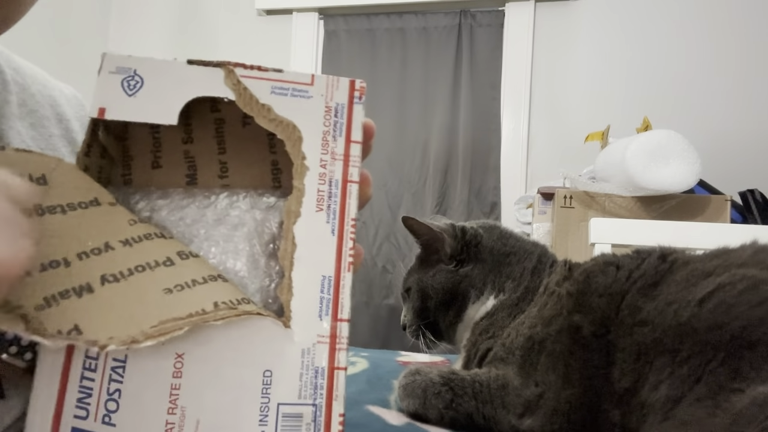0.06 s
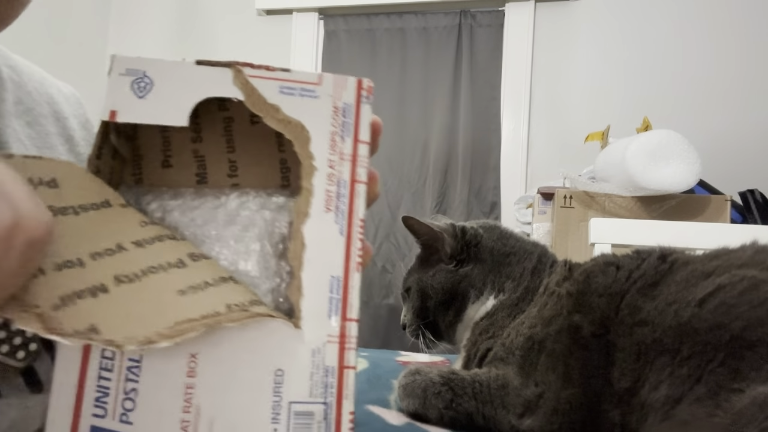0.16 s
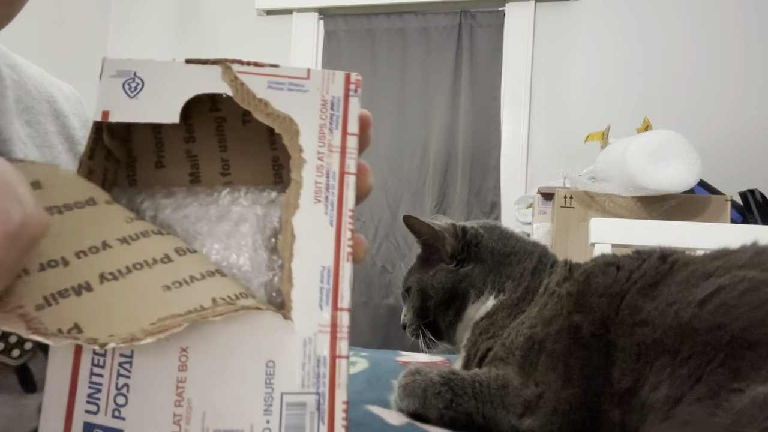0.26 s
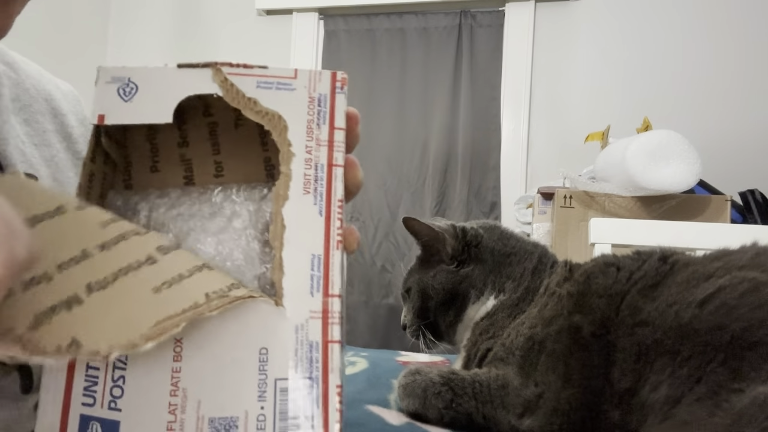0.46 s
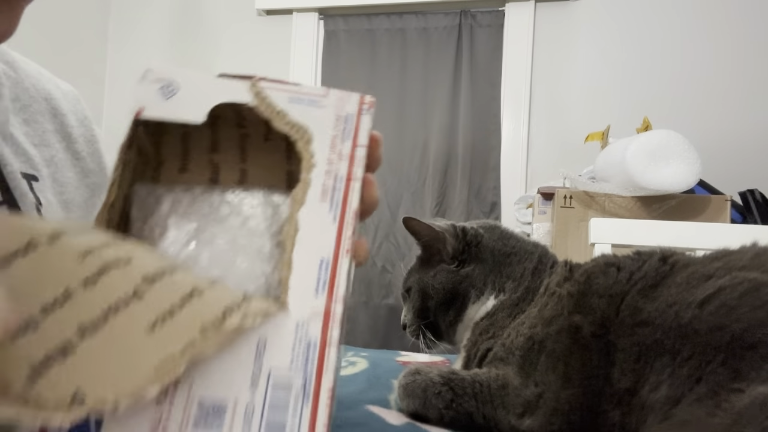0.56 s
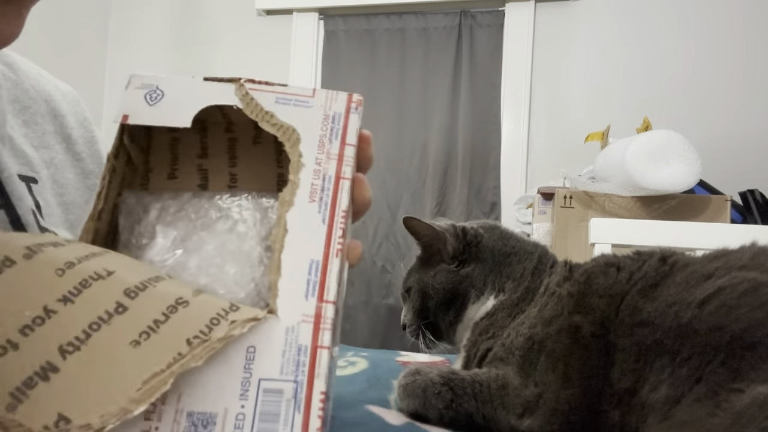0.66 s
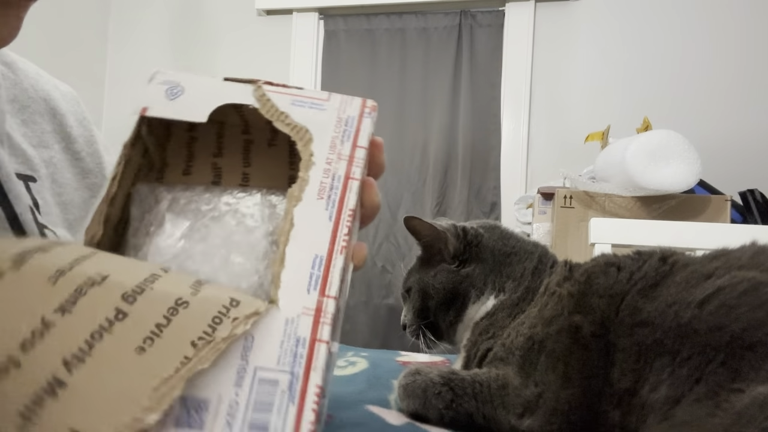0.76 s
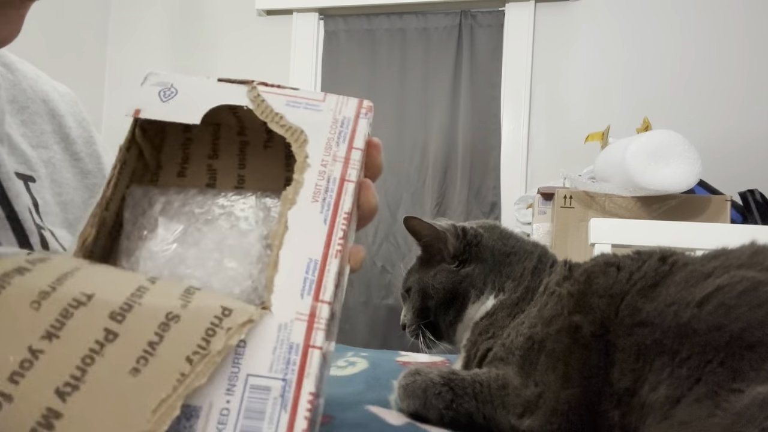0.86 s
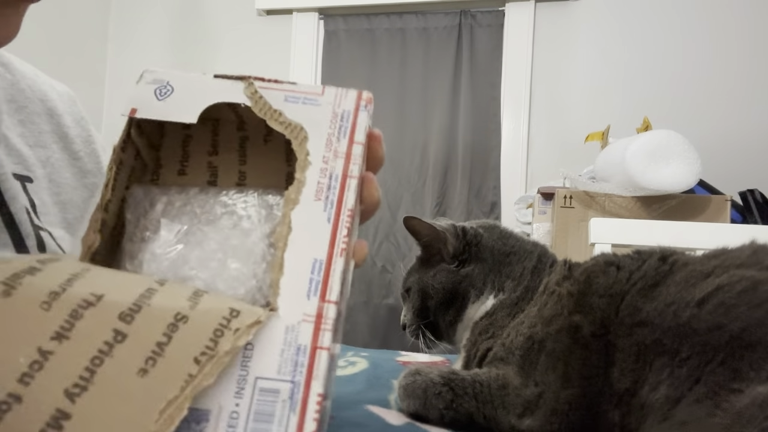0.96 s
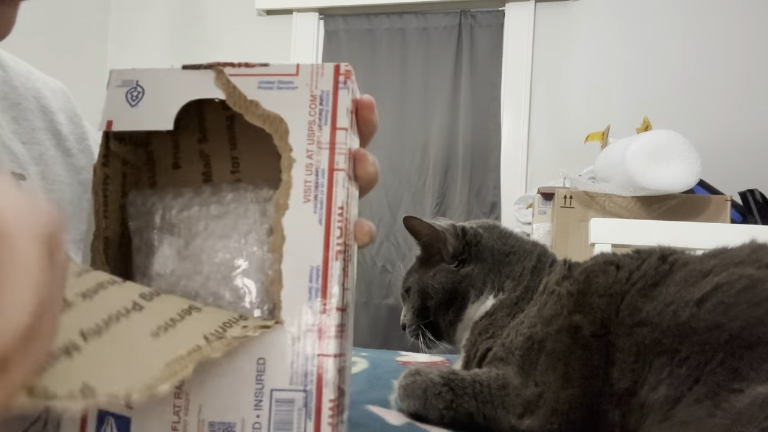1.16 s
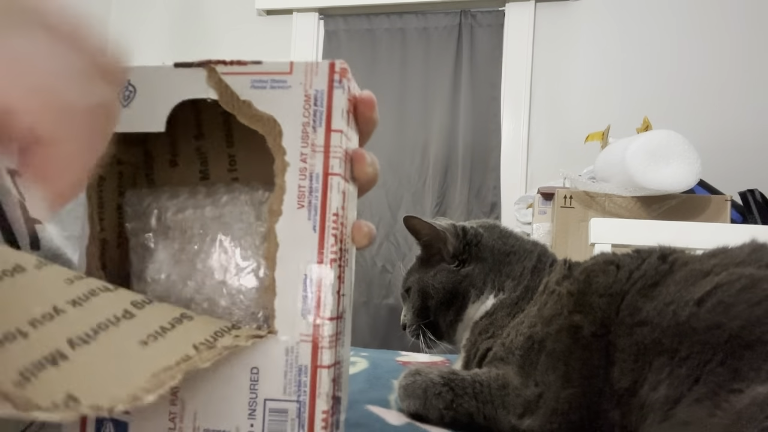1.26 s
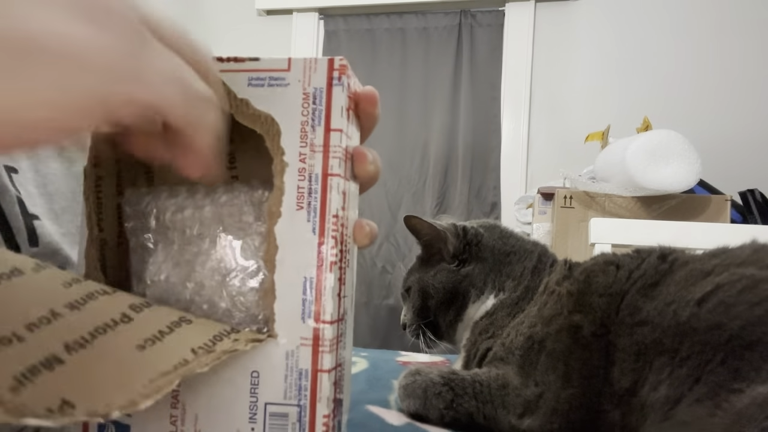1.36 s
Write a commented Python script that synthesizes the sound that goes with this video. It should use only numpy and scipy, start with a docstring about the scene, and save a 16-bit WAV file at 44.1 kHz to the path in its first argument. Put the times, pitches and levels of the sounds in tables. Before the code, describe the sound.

Cardboard tearing close to a phone microphone in a small quiet room: faint handling and creaks, a loud crackling rip, a shorter softer rip with sharp ticks, then a brief hollow pop.

```python
"""A quiet room, close to a phone: a corrugated cardboard flap is torn by hand in two pulls.
Fibres part in a hiss of shaped noise; the flutes give way in clumps of short damped rings of the panel.
Bends creak as gliding overtones, fibres tick, and a hand sliding over the card is faint noise and rumble.
One last bit of flap pops free as a sum of damped modes; decaying noise tails answer from the walls."""
import sys
import numpy as np
from scipy import signal
from scipy.fft import rfft, irfft, next_fast_len
from scipy.io import wavfile
from scipy.ndimage import uniform_filter1d, map_coordinates

SR = 44100
rng = np.random.default_rng(int(sys.argv[2]) if len(sys.argv) > 2 else 0)


def output_pcm(signal):
    """Save a mono or channel-first signal as 16-bit PCM at the path in sys.argv[1].

    Samples are clipped to [-1, 1] before scaling.
    """
    pcm = np.clip(np.atleast_2d(signal).T, -1, 1) * 32767
    wavfile.write(sys.argv[1], SR, np.round(pcm).astype(np.int16))


def to_linear_factor(level_db):
    """Convert decibel levels (scalar or array-like) to linear amplitude factors."""
    exponent = np.asarray(level_db, float) / 20
    return 10 ** exponent


N = 61739

# Spectrum of the room tone: f/Hz, relative level/dB
ROOM_SPECTRUM = [(15, -54), (25, -18), (76, 0.5), (137, -13.5), (212, -9), (236, -2), (301, -5.5),
                 (503, -45), (1610, -25), (2000, -17), (2910, -41.5), (11300, -45), (16000, -86)]
# Reverberation of the walls: f/Hz, t60/s
WALL_DECAY = [(150, 0.074), (1500, 0.28), (10000, 0.088)]
# Phase between the microphone ports: f/Hz, lead of the left/rad
PORT_LEAD = [(0, 0), (1460, 0.2), (2500, 1.1), (3100, -0.2), (3530, 0.4), (4310, 3.8), (4820, 4.6),
             (5250, 7.0), (6630, 9.3), (7490, 9.7), (9910, 12.5), (11600, 12.7), (15200, 15.7),
             (16400, 15.8)]
# Level between the ports: f/Hz, left over right/dB
PORT_TILT = [(60, -0.5), (110, 0.0), (200, 0.0), (380, 1.5), (700, 1.5), (1290, -1.5), (2380, -2.5),
             (4400, -3.0), (8120, -1.0), (15000, 0.0)]
# Part that differs between the ports: f/Hz, level/dB (before an offset for each kind of sound)
PORT_UNLIKE = [(60, -17), (300, -9), (700, -1.5), (1500, -11), (3500, 2.5), (9000, -9.5), (15000, -14)]
# Bends creaking: start t/s, length/s, start f/Hz, end f/Hz, level/dB (f before wander, level before roughness)
CREAKS = [(0.122, 0.056, 1253, 1402, -28), (0.154, 0.044, 694, 758, -31), (.922, 0.082, 430, 470, -34),
          (0.995, 0.055, 620, 760, -39.5), (1.04, 0.026, 395, 375, -36)]
# Overtones of a creak from the second harmonic up: level/dB relative to the fundamental
CREAK_OVERTONES = [-17, -12, -20]
# The flap popping free: t/s, peak level of the ring/dB, pitch factor, crack level/dB (before its envelope)
POPS = [(1.1568, -19, 1.8, -33), (1.1604, -11, 1.0, -24)]
# Modes of the flap at pitch factor 1: f/Hz, relative level/dB, t60/s
FLAP_MODES = [(190, -19, .2), (371, -16, .08), (780, -3, .04), (985, 4, .022), (1150, 2, .033),
              (1575, 3, .018), (1860, 1, .016), (4350, -3, .01)]
# Single fibres ticking apart: t/s, peak level/dB
TICKS = [(0.1654, -47), (0.1725, -33), (0.187, -28), (0.5746, -27), (0.8007, -22), (0.8131, -15),
         (0.8151, -17.5), (0.8253, -30), (0.834, -33), (0.8434, -31), (0.8457, -28), (0.8472, -31),
         (0.8604, -34)]
# Flutes giving way: t/s, peak level of the ring/dB, panel f/Hz, crack level over that peak/dB (before CRACK_DB)
SNAPS = [(0.241, -22.5, 896, -2), (0.252, -20.5, 890, -14), (0.265, -19.5, 1180, -9),
         (0.279, -16.5, 1600, -9), (0.353, -13.5, 1696, -12), (0.355, -13, 877, -31),
         (0.394, -18.5, 1644, -14), (0.403, -16, 965, -7), (0.421, -22, 992, -30), (0.44, -13.5, 950, -4),
         (0.451, -18, 856, 4), (0.464, -16.5, 886, -16), (0.477, -7, 2010, -9), (0.48, -11, 883, -28),
         (0.489, -17, 1740, 1.5), (0.49, -10, 1846, -10), (0.498, -9.5, 1606, -12), (0.5054, -9, 1737, -11),
         (0.513, -19, 1845, -2), (0.518, -11, 1760, -7.5), (0.603, -24, 1446, -6), (0.628, -20, 1510, -3),
         (0.654, -16, 1680, -3.5), (0.696, -22, 1240, -18), (0.706, -15.5, 926, -2), (0.709, -15, 633, -14),
         (0.714, -17, 1280, -4), (0.718, -16, 870, -17), (0.728, -23, 1000, -4.5),
         (0.74, -17.5, 1440, -5.5), (0.744, -18.5, 1485, 3), (0.75, -16, 1137, -9),
         (0.7576, -16.5, 1304, -5.5), (0.774, -21, 1450, -1.5)]
# Course of the tearing: t/s, then level/dB of torn edge, fibre hiss, box rumble, box face (before fixed trims)
PULL = [(0.0, -54, -58, -48, -68), (0.019, -49, -48.5, -46, -40.5), (0.064, -42.5, -41, -45, -35.5),
        (0.087, -45.5, -45.5, -42.5, -47.5), (0.128, -36.5, -50, -42, -38.5), (0.158, -34, -61, -55, -43.5),
        (0.192, -34, -43.5, -43.5, -52), (0.244, -32, -41, -58, -27), (0.268, -32, -36.5, -37, -31.5),
        (0.338, -30.5, -38.5, -45, -42), (0.358, -33, -31, -32.5, -30.5), (0.376, -35.5, -40, -36, -37),
        (0.4, -24.5, -32.5, -38, -33), (0.435, -33.5, -38.5, -41, -59), (0.444, -19.5, -27, -37, -40),
        (0.475, -22.5, -21, -39.5, -26), (0.495, -21, -24.5, -29.5, -20), (0.53, -27.5, -23, -33.5, -22.5),
        (0.549, -41, -40.5, -36.5, -39.5), (0.584, -46, -45, -55, -44), (0.622, -34.5, -34, -51, -46.5),
        (0.674, -27, -27.5, -58, -29.5), (0.712, -33, -27, -46, -32), (0.781, -34, -37, -44, -37.5),
        (0.864, -56, -56.5, -55, -52), (0.898, -57, -60, -49, -59), (0.946, -56, -60.5, -48, -48),
        (0.988, -51, -65, -48.5, -44), (1.016, -48.5, -55, -46, -37.5), (1.045, -45.5, -45.5, -45, -43.5),
        (1.124, -55.5, -57.5, -44, -47.5), (1.148, -60, -58.5, -55.5, -38), (1.172, -65, -50, -32, -46),
        (1.202, -68, -61, -49, -46.5), (1.242, -59, -66, -44, -53), (1.4, -61.5, -74, -51, -57.5)]
# Spectrum of the ringing panel: f/Hz, relative level/dB
PANEL_SPECTRUM = [(120, -55), (200, -8.5), (267, -17), (314, 1), (352, -7), (446, -1), (573, -6.5),
                  (755, -1), (1220, -4.5), (1680, -1), (2060, -3), (2330, -8), (4000, -5.5), (5200, -14.5),
                  (8800, -120)]
# Spectrum of parting fibres: f/Hz, relative level/dB
FIBRE_SPECTRUM = [(1470, -18), (2500, -6.5), (5130, -6.5), (6300, -4.5), (7260, -6), (9650, -6),
                  (11600, -6), (14900, -5.5), (16500, -62)]
# Spectrum of the box rumble: f/Hz, relative level/dB
BOX_SPECTRUM = [(15, -52), (25, -31), (75, -5), (145, -0.5), (215, -8), (313, -14.5), (350, -4), (460, -19),
                (770, -120)]

ROOM_TONE_DB, WALLS_DB = -52, -17
SHARP_UNLIKE_DB = -9  # less of the differing part for ticks and pops, which keeps them crisp
CREAK_WANDER, CREAK_ROUGH_DB, CREAK_TOP_HZ = 0.03, 2.2, 1900
CREAK_LAG, CREAK_RIGHT_DB = 8, -4  # samples later and dB weaker in the right port
POP_TOP_HZ, TIGHT_POP_TOP_HZ = 5000, 2500  # modes rung by the full pop and by the tight first step
POP_RISE_CYCLES, POP_AGAINST_HZ = 0.8, 985  # time constant of mode build-up; mode of opposite sign
TICK_S = 0.0003
SNAP_RISE_S, SNAP_FALL_S = 0.0019, 0.002
SNAP_Q, SNAP_RATTLE = 1.8, 0.42  # rattle rms against a sine of amplitude 1
CRACK_DB = -5
BELLY_HZ = 633  # the wide face of the box sounds below, the torn edge above


def unit(x):
    """Normalisation to unit rms."""
    return x / np.sqrt(np.mean(x ** 2) + 1e-20)


def along(points, hz):
    """Interpolation of (f/Hz, value) points on a logarithmic frequency axis."""
    f, v = np.transpose(points)
    return np.interp(np.log(hz + 1), np.log(f + 1), v)


def wobble(rate):
    """Smooth random modulation: spline through random knots, rate of them a second."""
    knots = rng.standard_normal(int(N * rate / SR) + 4)
    return map_coordinates(knots, [np.arange(N) * rate / SR])


def filtered(x, response):
    """Linear filtering: the spectrum times a response of frequency."""
    m = next_fast_len(N + 8192)
    hz = np.fft.rfftfreq(m, 1 / SR)
    return irfft(rfft(x, m) * response(hz), m)[..., :N]


def coloured(x, spectrum):
    """Spectral shaping by a table of levels, to unit rms."""
    return unit(filtered(x, lambda hz: to_linear_factor(along(spectrum, hz))))


def add(track, s, sound):
    """Superposition of a sound on a track from time s."""
    i = round(s * SR)
    track[i:i + len(sound)] += sound[:len(track) - i]


def grains(count, hz, octaves, cycles, spread_db):
    """Shot noise: randomly timed damped sines, a few of them large, to unit rms."""
    u, t = rng.random((count, 4)), np.arange(400) / SR
    pitch = (hz * 2 ** (octaves * (2 * u[:, 1] - 1)))[:, None]
    size = to_linear_factor(-spread_db * np.log(1 - 0.995 * u[:, 2]))[:, None]
    wave = size * np.sin(2 * np.pi * pitch * t) * np.exp(-t * pitch / cycles)
    at = (u[:, :1] * N).astype(int) + np.arange(400)
    return unit(np.bincount(at.ravel(), wave.ravel(), N + 400)[:N])


def ports(x, unlike_db=0):
    """Partial coherence of two ports: phase lead, tilt and a randomly shifting share that differs."""
    side = np.array([[0.5], [-0.5]])
    z = signal.stft(x, nperseg=256)[2]
    field = rng.standard_normal((2,) + z.shape)
    field = uniform_filter1d(field, size=3, axis=1)
    field = uniform_filter1d(field, size=6, axis=2)
    turn = (unit(field[0]) + 1j * unit(field[1])) / np.sqrt(2)
    shift = signal.istft(z * turn, nperseg=256)[1][:N]
    unlike = filtered(shift, lambda hz: to_linear_factor(along(PORT_UNLIKE, hz) + unlike_db))
    pair = x + 2 * side * unlike  # added in one port, subtracted in the other

    def between_ports(hz):
        """Interchannel level and phase, shared equally between the ports."""
        lead = np.interp(hz, *np.transpose(PORT_LEAD))
        return to_linear_factor(side * along(PORT_TILT, hz)) * np.exp(1j * side * lead)

    return filtered(pair, between_ports)


def room_tone():
    """Stationary background noise of a given spectrum."""
    return to_linear_factor(ROOM_TONE_DB) * ports(coloured(rng.standard_normal(N), ROOM_SPECTRUM))


def tail(t60s, size):
    """Diffuse decay: two unrelated noise tails of unit energy, dying exponentially by band."""
    hz, t, z = signal.stft(rng.standard_normal((2, size)), SR, nperseg=128)
    decay = to_linear_factor(-60 * t / along(t60s, hz)[:, None])
    h = signal.istft(z * decay, SR, nperseg=128)[1]
    return h / np.linalg.norm(h, axis=1, keepdims=True)


def walls(x):
    """Reverberation as convolution with a diffuse decay, after a delay of 300 samples."""
    late = np.pad(x, (300, 0))[None]
    return to_linear_factor(WALLS_DB) * signal.fftconvolve(late, tail(WALL_DECAY, size=SR // 3), axes=1)[:, :N]


def creaks():
    """Stick-slip friction: a fold slips at an unsteady rate, which gives a gliding harmonic tone."""
    out, drift, rough = np.zeros(N), wobble(120), wobble(190)
    for s, length, from_hz, to_hz, db in CREAKS:
        u = np.linspace(0, 1, round(length * SR))
        i = round(s * SR) + np.arange(len(u))
        hz = (from_hz + (to_hz - from_hz) * u) * (1 + CREAK_WANDER * drift[i])
        phase = 2 * np.pi * np.cumsum(hz) / SR
        tone = np.sin(phase)
        for k, overtone_db in enumerate(CREAK_OVERTONES, start=2):
            if k * from_hz < CREAK_TOP_HZ:
                tone = tone + to_linear_factor(overtone_db) * np.sin(k * phase)
        level = to_linear_factor(db + CREAK_ROUGH_DB * np.clip(rough[i], -4, 1.2))
        add(out, s, level * tone * np.sin(np.pi * u) ** 0.36)
    return out


def pops():
    """Modal superposition: the flap jumps free in two steps, each ringing its damped modes."""
    out, t = np.zeros(N), np.arange(SR // 8) / SR
    for s, db, pitch, crack_db in POPS:
        top_hz = TIGHT_POP_TOP_HZ if pitch > 1.2 else POP_TOP_HZ
        ring = np.zeros(len(t))
        for mode_hz, level, t60 in FLAP_MODES:
            hz = mode_hz * pitch
            if hz < top_hz:
                decay = to_linear_factor(level - 60 * t * pitch / t60)
                rise = 1 - np.exp(-t * hz / POP_RISE_CYCLES)
                ring += decay * rise * np.sin(2 * np.pi * hz * t + np.pi * (mode_hz == POP_AGAINST_HZ))
        noise = rng.standard_normal(len(t) + 1)
        dull = uniform_filter1d(rng.standard_normal(len(t) + 1), size=4)
        burst = t / 0.00069 * np.exp(1 - t / 0.0005)
        crack = to_linear_factor(crack_db) * burst * np.diff(noise + 4 * dull)
        add(out, s, to_linear_factor(db) * ring / np.abs(ring).max() + crack)
    return out


def ticks():
    """Impulsive release: single fibres let go as bright, brief clicks."""
    out, t = np.zeros(N), np.arange(300) / SR
    spectrum = [(1500, -13), (6000, -14), (10000, -16), (13500, -3), (16000, -6)]  # f/Hz, level/dB
    bright = coloured(rng.standard_normal(N), spectrum)
    for s, db in TICKS:
        click = t / TICK_S * np.exp(-t / TICK_S) * np.roll(bright, -round(s * SR))[:len(t)]
        add(out, s, to_linear_factor(db) * click / np.abs(click).max())
    return out


def snaps():
    """Transient resonance: a failing flute rings the panel, with narrow-band rattle and a fibre crack."""
    out, t = np.zeros(N), np.arange(1500) / SR
    shape = (1 - np.exp(-t / SNAP_RISE_S)) * np.exp(-t / SNAP_FALL_S)
    fibres = coloured(rng.standard_normal(N), FIBRE_SPECTRUM)
    for s, db, hz, crack_db in SNAPS:
        b, a = signal.iirpeak(hz, SNAP_Q, SR)
        rattle = unit(signal.filtfilt(b, a, rng.standard_normal(len(t))))
        tone = np.sin(2 * np.pi * hz * t + 2 * np.pi * rng.random())
        ring = shape * (tone + SNAP_RATTLE * rattle)
        hiss = np.roll(fibres, -round(s * SR))[:len(t)]
        crack = to_linear_factor(crack_db + CRACK_DB) * hiss * shape / shape.max()
        add(out, s, to_linear_factor(db) * (ring / np.abs(ring).max() + crack))
    return out


def tearing():
    """Fracture noise: strain rings the card in clumps, shared by hissing fibres; the box rumbles."""
    s, *columns = np.transpose(PULL)
    t = np.arange(N) / SR
    edge_db, hiss_db, rumble_db, face_db = [np.interp(t, s, c) for c in columns]
    clump_db = 0.84 * wobble(59.38) + wobble(220)
    rings = grains(count=7000, hz=1000, octaves=1.405, cycles=1.3, spread_db=2.5)
    rings = filtered(rings, lambda hz: 1 + hz / 2500)
    panel = coloured(rings + 0.84 * rng.standard_normal(N), PANEL_SPECTRUM)
    face = filtered(panel, lambda hz: 1 / (1 + (hz / BELLY_HZ) ** 8))
    edge = panel - face
    crackle = rng.standard_normal(N) * (0.99 + 0.32 * to_linear_factor(6.7 * wobble(900)))
    fibres = coloured(crackle, FIBRE_SPECTRUM)
    rumble = coloured(rng.standard_normal(N), BOX_SPECTRUM)
    return (to_linear_factor(edge_db - 0.5) * unit(to_linear_factor(clump_db) * edge)
            + to_linear_factor(face_db - 3.0) * unit(to_linear_factor(clump_db) * face)
            + to_linear_factor(hiss_db + 0.14) * unit(to_linear_factor(0.4 * clump_db) * fibres)
            + to_linear_factor(rumble_db - 1.5 + 0.85 * wobble(24.4)) * rumble)


def scene():
    """Superposition of direct sound close to the ports, reverberation and room tone."""
    box = tearing() + snaps()
    sharp = ticks() + pops()
    creak = creaks()
    creak_pair = np.array([creak, to_linear_factor(CREAK_RIGHT_DB) * np.roll(creak, CREAK_LAG)])
    direct = ports(box) + ports(sharp, SHARP_UNLIKE_DB) + creak_pair
    return direct + walls(box + sharp + creak) + room_tone()


def band_limit(x):
    """A steep low-pass at the top of the band."""
    return signal.sosfilt(signal.butter(12, 16810, fs=SR, output="sos"), x)


def record(dry):
    """Band limitation: the phone rolls off its top band steeply, to half amplitude at 16 kHz."""
    mix = filtered(dry, lambda hz: 1 / (1 + (hz / 16000) ** 40))
    return band_limit(mix)


dry = scene()
out = record(dry)
output_pcm(out)
```